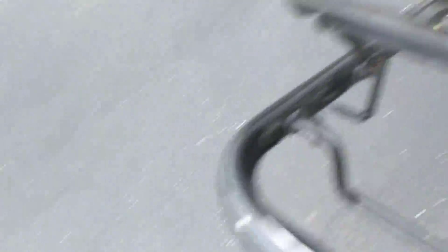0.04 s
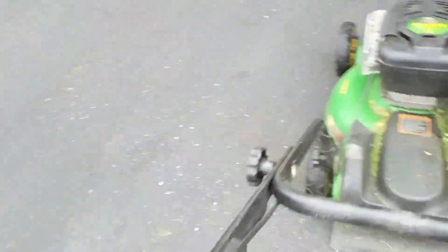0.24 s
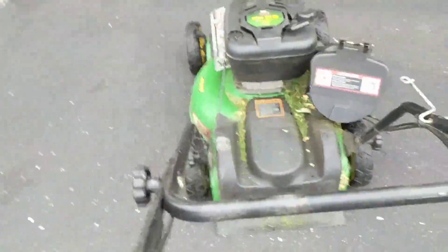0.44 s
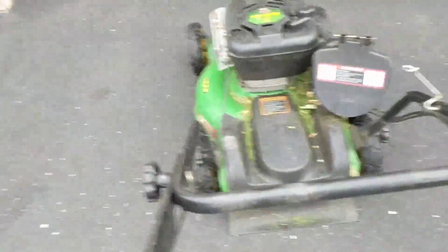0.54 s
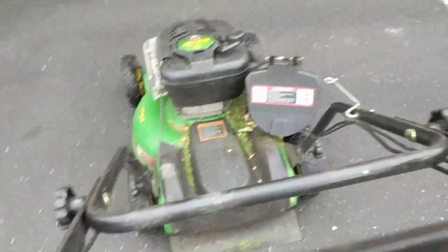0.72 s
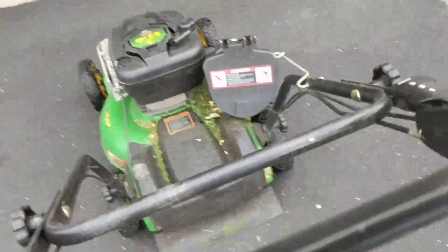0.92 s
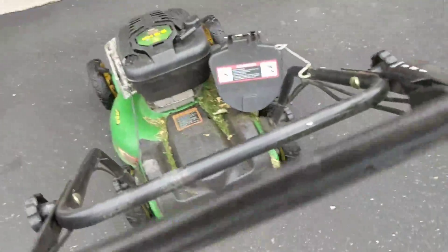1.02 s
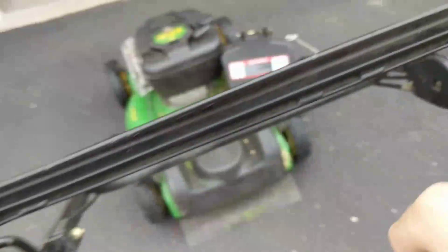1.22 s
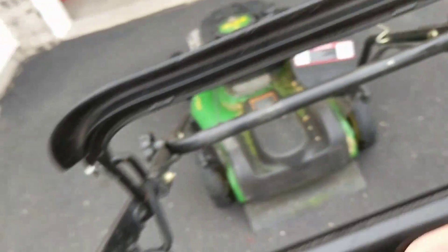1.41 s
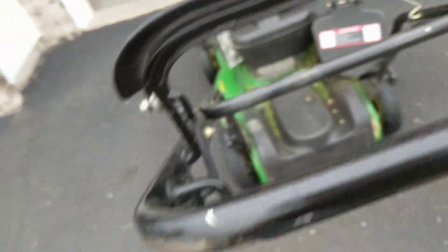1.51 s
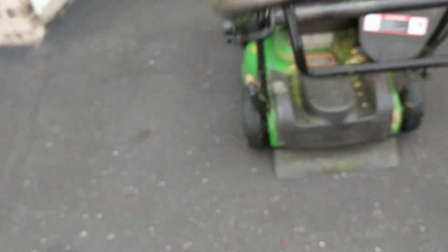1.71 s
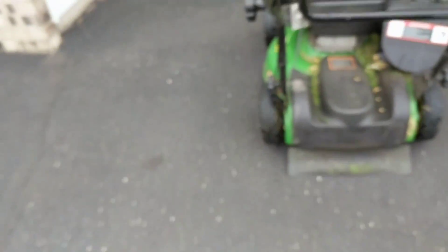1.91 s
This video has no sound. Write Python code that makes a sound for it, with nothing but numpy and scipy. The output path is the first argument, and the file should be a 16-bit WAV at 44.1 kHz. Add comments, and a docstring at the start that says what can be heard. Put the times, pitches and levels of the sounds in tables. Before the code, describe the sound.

A lawn mower's folding steel handle swings over and drops with a loud, ringing clatter. Its dry pivot gives a short, high squeak, then loose parts knock and tick, close up in a hard-walled room with a low hum.

```python
"""A hard-walled room, one microphone close to a parked lawn mower with its engine off.
The folding steel handle is swung over and drops with a loud clatter: chattering knocks ring the
frame, metal contacts ping and the deck booms. The dry pivot sticks and slips in a squeak, then loose
parts knock and tick. Under it lie a low room hum and the soft rumble and rustle of handling."""
import sys
import numpy as np
from scipy import signal
from scipy.fft import rfft, irfft
from scipy.io import wavfile

SR = 44100
rng = np.random.default_rng(int(sys.argv[2]) if len(sys.argv) > 2 else 0)


def unload_audio(sound):
    """Save the sound as a 16-bit wav file, at the path given as the first command line argument."""
    columns = np.transpose(np.atleast_2d(sound))
    # keep every value between -1 and 1, then stretch to whole-number steps
    steps = np.round(np.clip(columns, -1, 1) * 32767)
    wavfile.write(sys.argv[1], SR, steps.astype(np.int16))


N = 85995
TOP_HZ = 16100  # upper limit of the sound


def amp(db):
    """Decibels to gain."""
    return 10 ** (np.asarray(db) / 20)


def unit_rms(x):
    """Scales to rms 1."""
    return x / np.sqrt(np.mean(x ** 2) + 1e-20)


def at_hz(points, hz):
    """Interpolates (Hz, value) points on a log-frequency axis."""
    point_hz, value = np.transpose(points)
    return np.interp(np.log(hz + 1), np.log(point_hz + 1), value)


def add(mix, start_s, sound):
    """Mixes a sound in at its start time."""
    part = mix[max(round(start_s * SR), 0):][:len(sound)]
    part += sound[:len(part)]


def colour(x, spectrum):
    """Minimum-phase filter that follows (Hz, dB) points."""
    log_gain = np.log(amp(at_hz(spectrum, abs(np.fft.fftfreq(8192, 1 / SR)))))
    response = np.exp(np.conj(signal.hilbert(log_gain)))
    taps = np.fft.ifft(response).real[:4096]
    return signal.fftconvolve(x, taps)[:len(x)]


def wobble(rate_hz):
    """Smooth random motion up to a rate, at rms 1."""
    rolloff = 1 + (np.fft.rfftfreq(N, 1 / SR) / rate_hz) ** 4
    return unit_rms(irfft(rfft(rng.standard_normal(N)) / rolloff, N))


# The room's reverberation. Each row: frequency in Hz, seconds to fall by 60 dB.
ROOM_T60 = [(100, 0.34), (400, 0.72), (1500, 0.33), (4000, 0.35), (8000, 0.35), (16000, 0.23)]

def room(x, wet_db, early_db=3.5, early_decay_s=0.0097):
    """The microphone hears the direct sound, early reflections off floor and mower, and a dull tail."""
    t = np.arange(SR) / SR
    hz, age_s, spectra = signal.stft(rng.standard_normal(SR), SR, nperseg=256)
    decay = amp(-60 * age_s / at_hz(ROOM_T60, hz)[:, None])
    tail = signal.istft(spectra * decay, SR, nperseg=256)[1][:SR]
    tail *= np.clip(t / 0.00067 - .5, 0, 1)  # starts just behind the direct sound
    reflections = rng.standard_normal(SR) * (rng.random(SR) < .04)
    early = reflections * (t > .002) * np.exp(-t / early_decay_s)
    echo = tail / np.linalg.norm(tail) + amp(early_db) * early / np.linalg.norm(early)
    return x + amp(wet_db) * signal.fftconvolve(x, echo)[:N]


# The steady noise of the room. Each row: frequency in Hz, relative level in dB.
AIR_SPECTRUM = [(20, -49), (40, -5), (58, 13.5), (110, 8.5), (200, -9), (400, -21.5), (1000, -29),
                (2000, -9), (3500, -26), (8000, -77), (16000, -96)]

def room_tone(hum_hz=79.5, hum_width_hz=13, hum_db=-52.5, air_db=-56):
    """All around the microphone: faint room noise and a wavering low hum."""
    phase = 2 * np.pi * hum_hz * np.arange(N) / SR
    hum = (1 + wobble(hum_width_hz)) * np.cos(phase) + wobble(hum_width_hz) * np.sin(phase)
    air = colour(rng.standard_normal(N), AIR_SPECTRUM)
    return amp(hum_db) * unit_rms(hum) + amp(air_db) * unit_rms(air)


# The handle's rumble and its rustle. Each row: frequency in Hz, relative level in dB.
RUMBLE_SPECTRUM = [(25, -33), (50, -6), (75, -2), (140, -3), (215, 1), (300, -2.5), (420, -13.5),
                   (650, -12), (1500, -31), (6000, -74)]
RUSTLE_SPECTRUM = [(50, 11), (300, -6), (600, 14), (850, 6.5), (1400, 10.5), (2200, 1.5), (3300, -4.5),
                   (6000, -6), (10000, -11.5), (16000, -16.5)]
# The course of the swing. Each row: time in seconds, rumble level in dB, rustle level in dB.
HANDLING_LEVELS = [(0, -47.5, -52.5), (.10, -44.5, -59), (.19, -47, -53), (.27, -34.5, -33.5),
                   (.39, -43, -60), (.44, -71, -49), (.50, -41.5, -59), (.62, -53, -55.5), (.72, -58, -62),
                   (.88, -56, -58), (1.0, -44.5, -55), (1.11, -49, -61.5), (1.19, -53.5, -59),
                   (1.32, -44, -58.5), (1.44, -48.5, -55), (1.54, -47.5, -51), (1.72, -47.5, -51.5),
                   (1.84, -44, -49), (1.95, -62.5, -43.5)]

def handling(crackles_per_s=260, crackle_db=-6, flicker_db=3.0, flicker_hz=35):
    """Close by, the moving handle rumbles, and rubs unevenly with a fine crackle."""
    t = np.arange(N) / SR
    times, rumble_db, rustle_db = np.transpose(HANDLING_LEVELS)
    rumble = unit_rms(colour(rng.standard_normal(N), RUMBLE_SPECTRUM))
    crackle = unit_rms(rng.standard_normal(N) * (rng.random(N) < crackles_per_s / SR))
    rustle = unit_rms(colour(rng.standard_normal(N) + amp(crackle_db) * crackle, RUSTLE_SPECTRUM))
    rumble *= amp(np.interp(t, times, rumble_db))
    rustle *= amp(np.interp(t, times, rustle_db) + flicker_db * wobble(flicker_hz))
    return rumble + rustle


# The pivot's chirps, hopping between a lower and a higher pitch.
# Each row: start in seconds, length in seconds, pitch in Hz, level in dB.
PIVOT_CHIRPS = [(0.86, 0.015, 4620, -46), (0.868, 0.017, 5160, -42), (0.884, 0.01, 4830, -42),
                (0.892, 0.033, 5280, -56), (0.91, 0.019, 5530, -33), (0.914, 0.023, 5035, -32),
                (.927, 0.012, 5755, -31), (0.935, 0.015, 5240, -29), (0.944, 0.0227, 5934, -31),
                (.957, 0.0205, 4996, -30)]
# The tone of a chirp. Each row: multiple of the pitch, relative level in dB.
CHIRP_PARTIALS = [(.5, -25), (1, -1.5), (1.5, -20), (2, -8), (3, -21)]

def pivot_squeak(pitch_rise=0.028, jitter=.014, waver_hz=700, flutter_db=3, rasp_db=-17, rasp_hz=1400):
    """The dry pivot sticks and slips in short, slightly rising chirps with a rasp."""
    out = np.zeros(N)
    for start_s, length_s, hz, db in PIVOT_CHIRPS:
        progress = np.arange(0, 1, 1 / (length_s * SR))
        n = len(progress)
        waver, flutter = wobble(waver_hz)[:n], wobble(waver_hz)[:n]
        cycles = np.cumsum(hz * (1 + pitch_rise * (progress - .5) + jitter * waver)) / SR
        slips = sum(amp(part_db) * np.sin(2 * np.pi * k * cycles) for k, part_db in CHIRP_PARTIALS)
        tone = unit_rms(slips * amp(flutter_db * flutter))
        rasp = wobble(rasp_hz)[:n] * np.sin(4 * np.pi * cycles)  # a noisy skirt around the octave
        swell = np.minimum(np.minimum(progress, 1 - progress) / 0.44, 1)  # 44% in, 44% out
        add(out, start_s, amp(db) * swell * (tone + amp(rasp_db) * rasp))
    return out


# Blows that make a panel of the deck boom. Each row: start in seconds, pitch in Hz, level in dB.
DECK_BLOWS = [(0.209, 206.5, -16.5), (.452, 578, -39), (0.49, 297, -32.5), (1.514, 211, -27)]

def deck_booms(rise_s=0.0042, t60_s=0.13):
    """A struck panel swells within milliseconds and rings down on one low note."""
    t, out = np.arange(SR // 2) / SR, np.zeros(N)
    swell = 1 - np.exp(-t / rise_s)
    for start_s, hz, db in DECK_BLOWS:
        add(out, start_s, amp(db - 60 * t / t60_s) * swell * np.sin(2 * np.pi * hz * t))
    return out


# Hard metal contacts. Each row: start in seconds, pitch in Hz, peak level in dB.
METAL_CONTACTS = [(0.209, 1860, -6), (0.217, 1880, -10), (0.2399, 5000, -17), (.272, 7280, -14),
                  (.345, 12500, -17.5), (.365, 12300, -32), (.457, 3330, -29.5), (0.4836, 7230, -19.5),
                  (0.5969, 11420, -31.5), (0.615, 12300, -41), (1.5165, 1260, -26.5), (1.685, 4770, -46),
                  (1.784, 1200, -28.5), (1.844, 1830, -39), (1.8816, 1270, -25.5), (1.9144, 11860, -21.5),
                  (1.925, 5050, -30), (1.947, 11400, -30)]

def metal_pings(modes=6, spread=0.078, decay_s=0.00057):
    """Each tiny contact rings a cluster of close modes that dies in a few milliseconds."""
    t, out = np.arange(1024) / SR, np.zeros(N)
    for start_s, hz, db in METAL_CONTACTS:
        detune, phase = rng.uniform(-0.51, 1, (2, modes, 1))
        cluster = np.sin(2 * np.pi * (hz * (1 + spread * detune) * t + phase)).sum(0)
        ping = cluster * t * np.exp(-t / decay_s)
        add(out, start_s, amp(db) * ping / abs(ping).max())
    return out


# Modes of the frame and deck. Each row: pitch in Hz, relative level in dB, seconds to fall by 60 dB.
FRAME_MODES = [(214, -16, .14), (283, -12, .25), (573, -17, .25), (1000, -18, .22), (1355, -13, .18),
               (1519, -15, .18), (1618, -14, .16), (1850, -16, .2), (1896, -15, .22), (2105, -16, .22),
               (2835, -15, .1), (4278, -16, .14), (4603, -17, .14)]

def frame_ring(knocks, ring_db):
    """The knocks, together with the ringing they set off in the tubes and deck."""
    t, ring = np.arange(SR) / SR, np.zeros(SR)
    for hz, db, t60_s in FRAME_MODES:
        scale = 2 * np.log(1000) / (t60_s * SR)  # makes the gain at resonance independent of the decay
        ring += scale * amp(db - 60 * t / t60_s) * np.sin(2 * np.pi * hz * t)
    return knocks + amp(ring_db) * signal.fftconvolve(knocks, ring)[:N]


# The tone all knocks share. Each row: frequency in Hz, relative level in dB.
KNOCK_SPECTRUM = [(100, -11), (210, -0.5), (380, -5.5), (820, -2.5), (1090, -8), (1350, 1), (1600, -2.5),
                  (2800, 1.5), (3400, 0.5), (4500, 4.5), (7500, -4.5), (11000, -6.5), (16000, -12)]
# Knocks of the handle and its fittings. Each row: start in seconds, relative levels in dB of the
# thud, body, clack and snap bands, decay in milliseconds.
HANDLE_KNOCKS = [(.005, -58, -62, -55, -58, 9.5), (0.0463, -54, -69, -52.5, -70, 2.9),
                 (.071, -38.5, -41.5, -42.5, -49.5, 5.9), (.146, -42.5, -54, -48.5, -64, 0.63),
                 (0.2, -42, -32, -36, -48, 7.4), (0.2071, -26.5, -18, -21, -28.5, 10),
                 (0.2376, -35, -26, -26, -28, 6.5), (0.2723, -31.5, -33.5, -26.5, -30.5, 0.93),
                 (0.28, -29.5, -33, -26.5, -35.5, 17.6), (0.297, -35, -30, -57, -39, 22),
                 (0.344, -34.5, -38, -37.5, -43, 8.4), (0.367, -36.5, -37, -39.5, -46.5, 11),
                 (.394, -37.5, -43.5, -52, -61, 5.4), (0.4524, -47, -49, -44, -33.5, 2.4),
                 (.456, -49.5, -46.5, -41.5, -52, 16), (.470, -56, -31.5, -35, -51, 9.4),
                 (.4835, -42, -47, -39, -38.5, 0.84), (.614, -46.5, -60, -50, -51.5, 18),
                 (.764, -49, -55, -61, -66, 4.5), (0.796, -66, -42, -45.5, -55, 8.2),
                 (0.813, -48, -45, -45.5, -48, 4), (1.08, -42, -42.5, -60, -77, 7.8),
                 (1.142, -67, -44.5, -40, -43.5, 5.1), (1.4829, -42, -39.5, -46.5, -56, 6.6),
                 (1.5114, -41.5, -37, -45, -55, 6.5), (1.587, -59, -47.5, -48, -68, 6.1),
                 (1.603, -52, -48, -52, -63, 7.3), (1.632, -46.5, -58, -47.5, -53.5, 14),
                 (1.653, -71, -43, -51.5, -60, 5), (1.6858, -67, -54, -45, -79, 0.68),
                 (1.766, -56, -47, -45.5, -53, 6.4), (1.780, -39.5, -38, -42, -47, 9),
                 (1.8391, -67, -42, -50, -68, 8.9), (1.8785, -39.5, -39.5, -37.5, -43.5, 7.6),
                 (1.923, -50, -40.5, -36, -37, 9.6), (1.937, -40, -43, -39, -55, 21)]

def handle_knocks(shove_s=0.00058, shove_db=-12, rise_share=0.12, grit=0.23, spot_db=2):
    """Close to the microphone, each knock is a blunt shove and a short burst of chattering contacts."""
    t, out = np.arange(8192) / SR, np.zeros(N)
    edges_hz = [178.5, 813, 2230, 8460, TOP_HZ]  # thud, body, clack and snap lie between these
    bands = [signal.butter(3, pair, "band", fs=SR, output="sos") for pair in zip(edges_hz, edges_hz[1:])]
    hz = np.geomspace(100, TOP_HZ, 70)
    shove = amp(shove_db) * t / shove_s * np.exp(-t / shove_s)
    for start_s, *levels_db, decay_ms in HANDLE_KNOCKS:
        age = 1000 * t / decay_ms
        envelope = np.exp(-age) * (1 - np.exp(-age / rise_share)) / np.sqrt(decay_ms)
        grain, size = rng.standard_normal((2, len(t)))
        chatter = grain * np.exp(grit * size) * envelope
        # each struck spot has resonances of its own
        tone_db = at_hz(KNOCK_SPECTRUM, hz) + spot_db * rng.standard_normal(len(hz))
        burst = colour(shove + chatter, np.transpose([hz, tone_db]))
        for band, db in zip(bands, levels_db):
            part = signal.sosfilt(band, burst)
            part *= np.sqrt(.025 * SR) / np.linalg.norm(part)  # the energy of 25 ms at rms 1
            add(out, start_s, amp(db) * part)
    return out


def scene():
    """At the microphone, in mono: the mower and its echoes over handling noise and room tone."""
    clatter = room(frame_ring(handle_knocks(), ring_db=14.5), wet_db=-11) * amp(-6)
    pings_and_booms = room(metal_pings() + deck_booms(), wet_db=-25.5)
    squeak = room(pivot_squeak(), wet_db=-8.5)
    return (clatter + pings_and_booms + squeak + handling() + room_tone())[None]


def record(dry):
    """The recorder cuts off the highest treble."""
    lowpass = signal.firwin(255, TOP_HZ, window=("kaiser", 9), fs=SR)
    return signal.oaconvolve(dry, lowpass[None], "same")


dry = scene()
out = record(dry)
unload_audio(out)
```